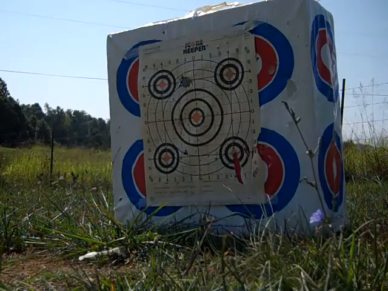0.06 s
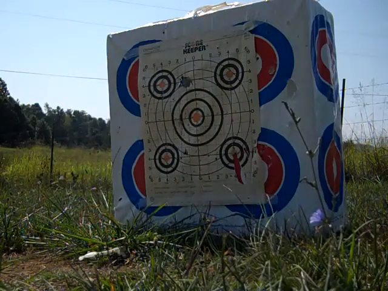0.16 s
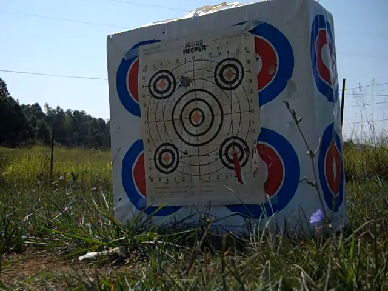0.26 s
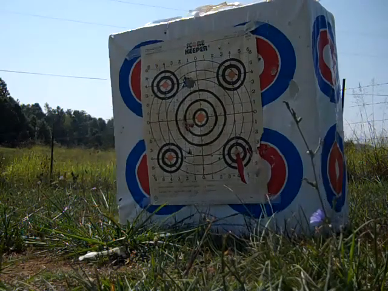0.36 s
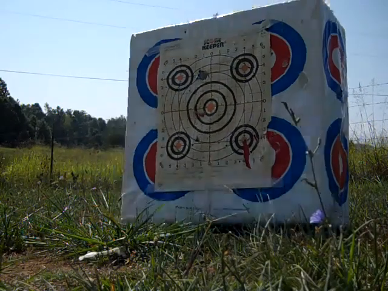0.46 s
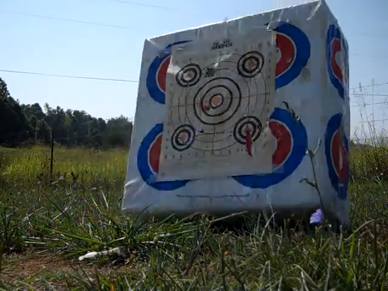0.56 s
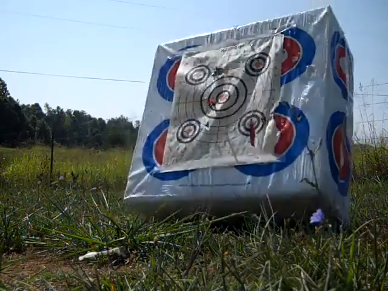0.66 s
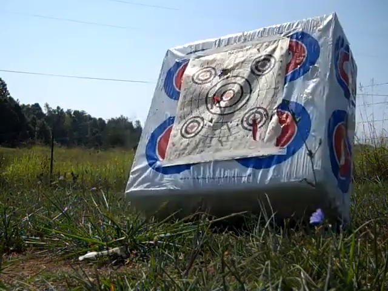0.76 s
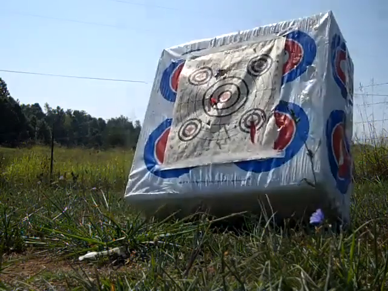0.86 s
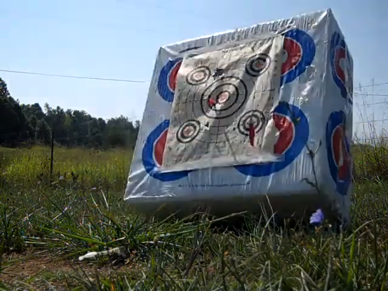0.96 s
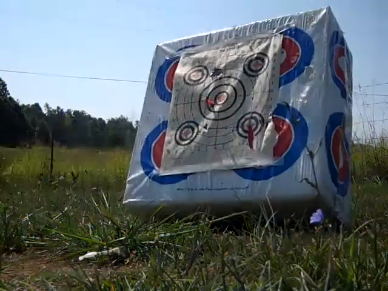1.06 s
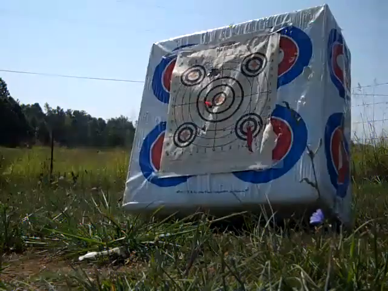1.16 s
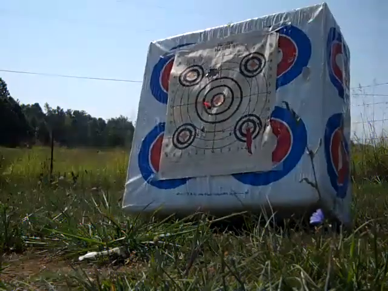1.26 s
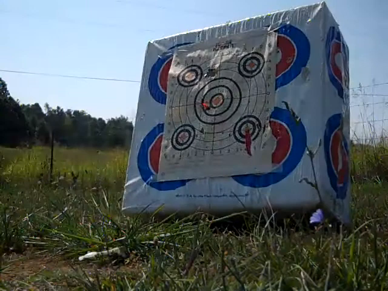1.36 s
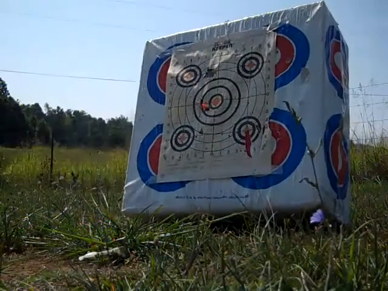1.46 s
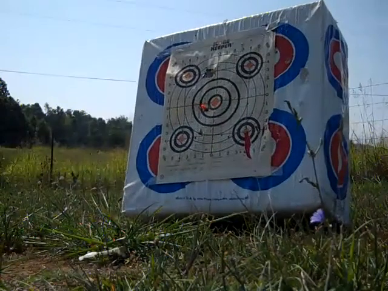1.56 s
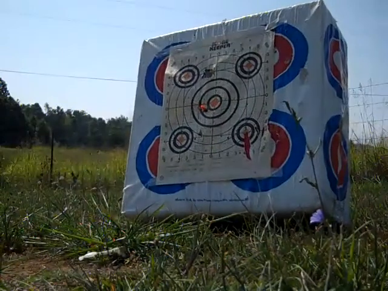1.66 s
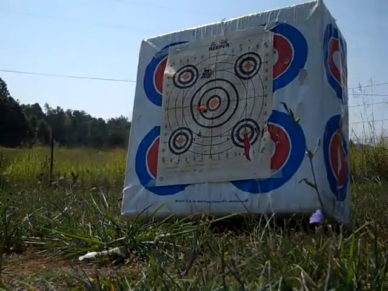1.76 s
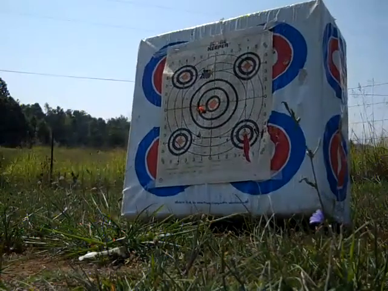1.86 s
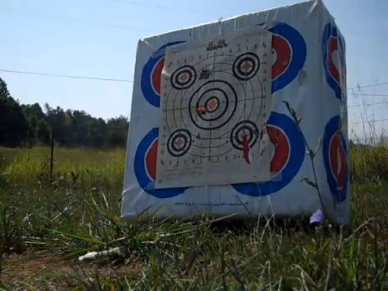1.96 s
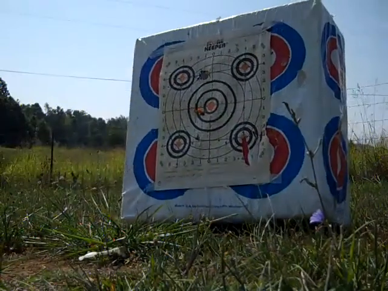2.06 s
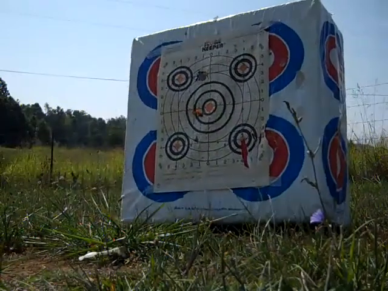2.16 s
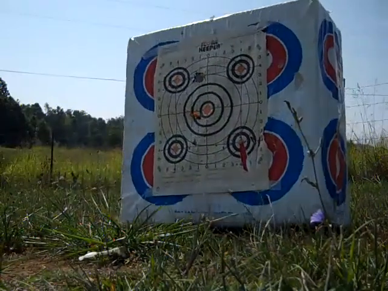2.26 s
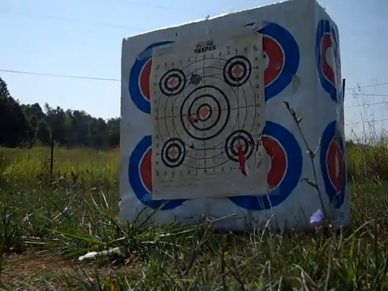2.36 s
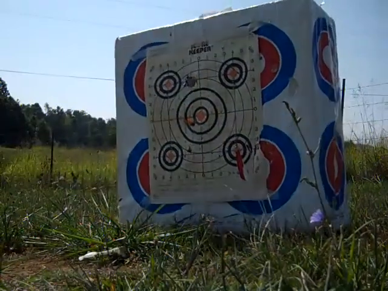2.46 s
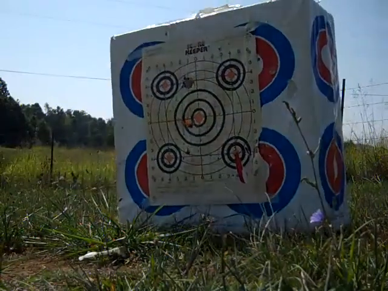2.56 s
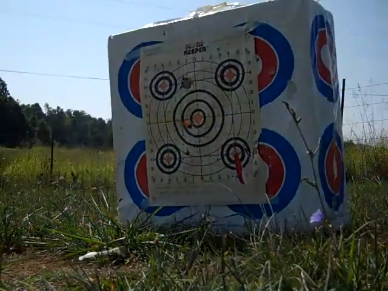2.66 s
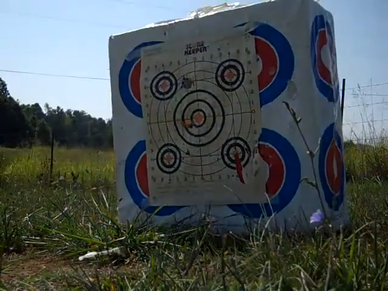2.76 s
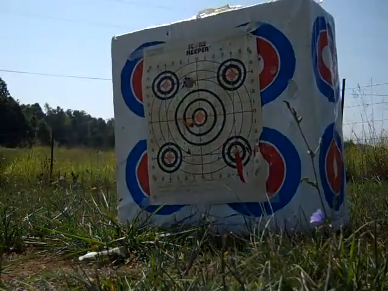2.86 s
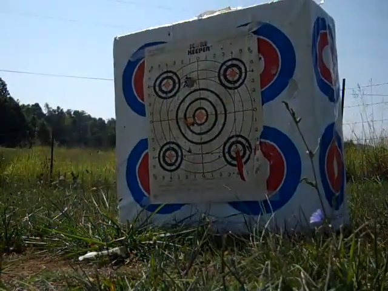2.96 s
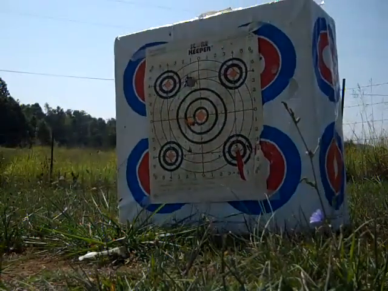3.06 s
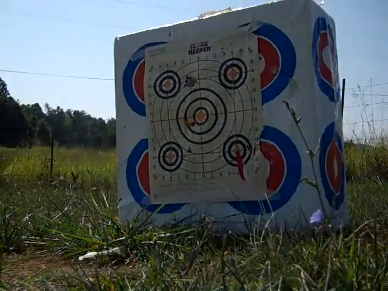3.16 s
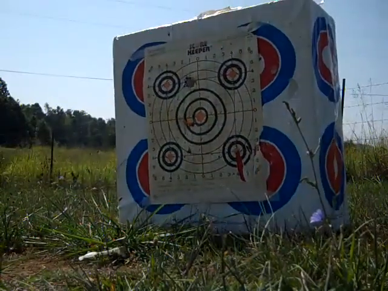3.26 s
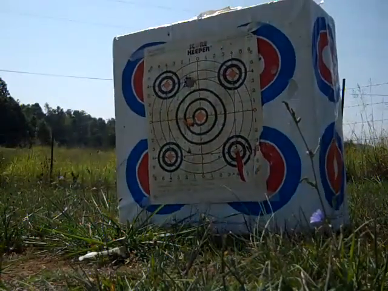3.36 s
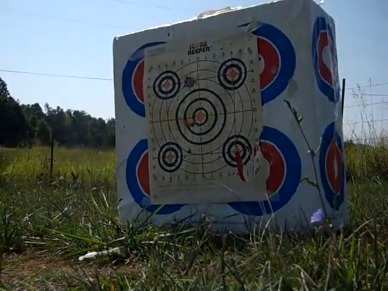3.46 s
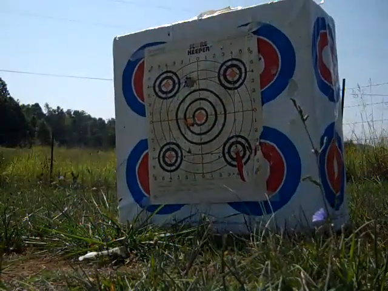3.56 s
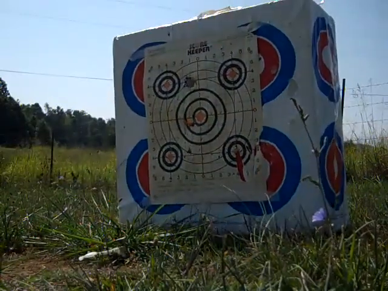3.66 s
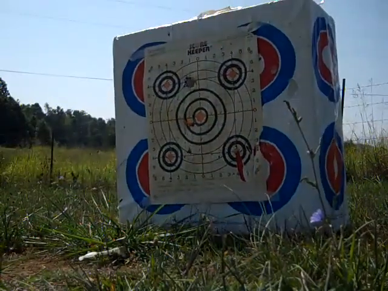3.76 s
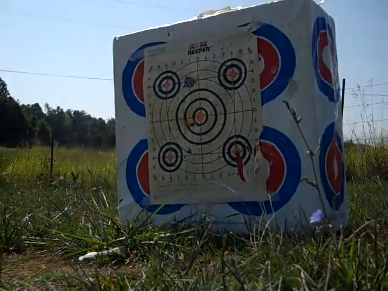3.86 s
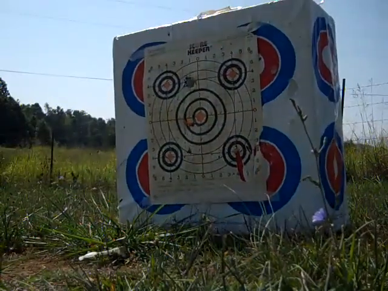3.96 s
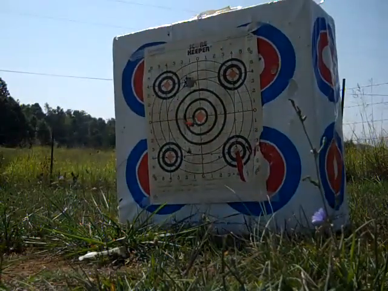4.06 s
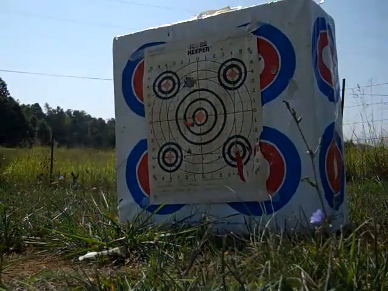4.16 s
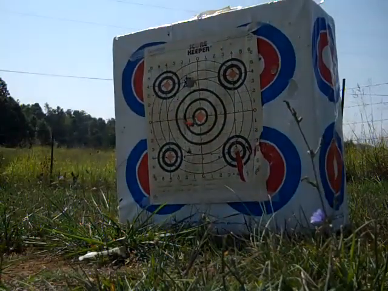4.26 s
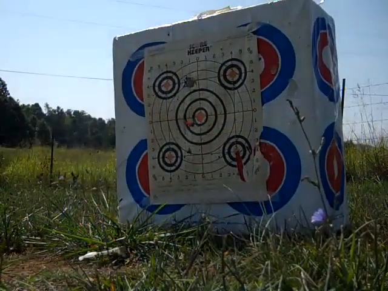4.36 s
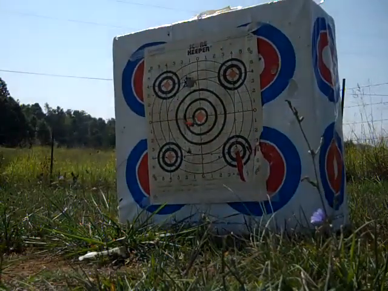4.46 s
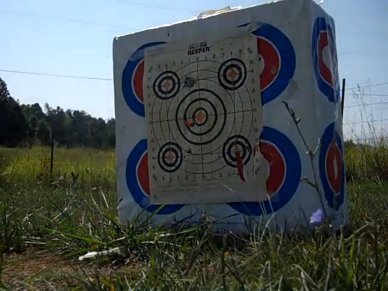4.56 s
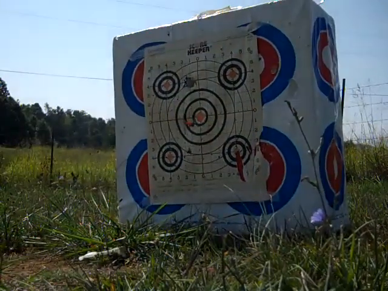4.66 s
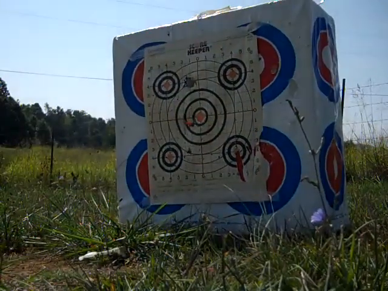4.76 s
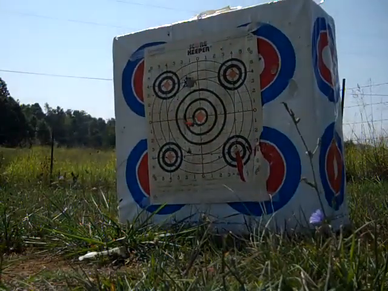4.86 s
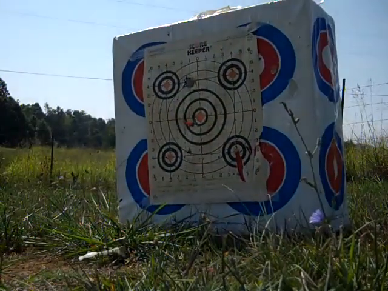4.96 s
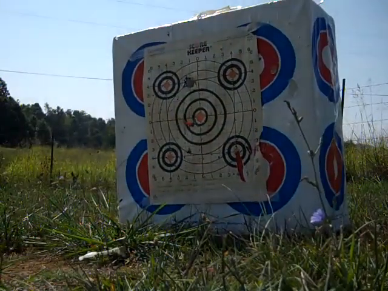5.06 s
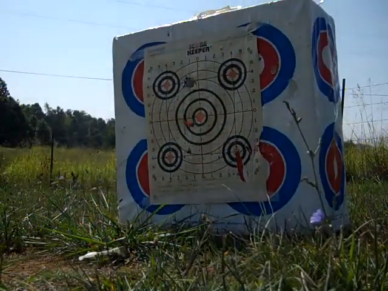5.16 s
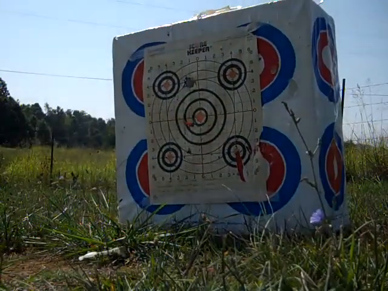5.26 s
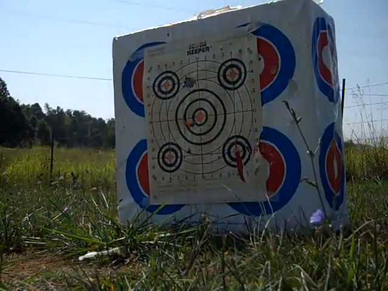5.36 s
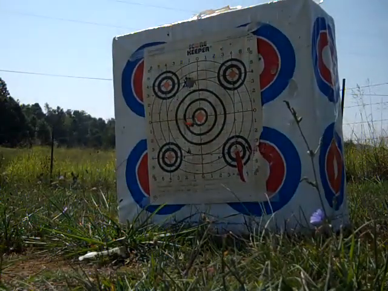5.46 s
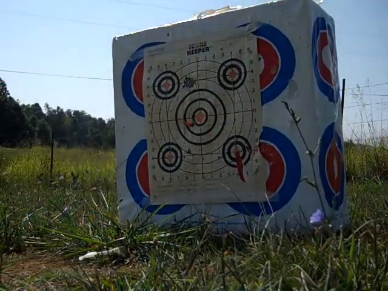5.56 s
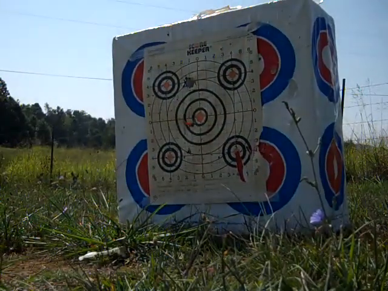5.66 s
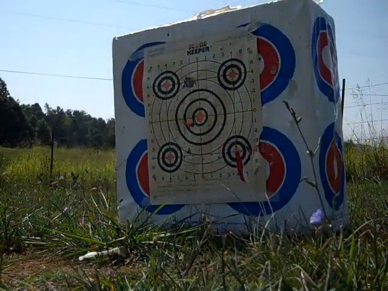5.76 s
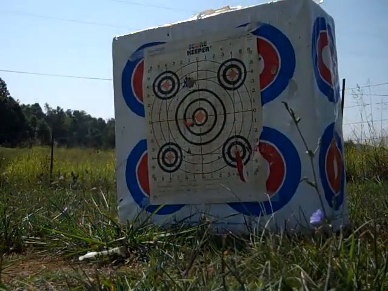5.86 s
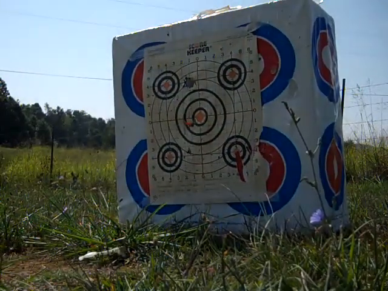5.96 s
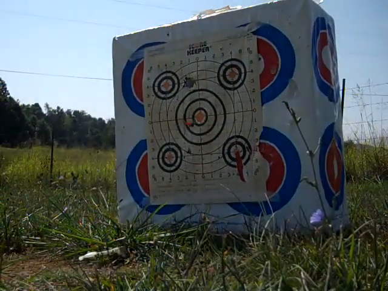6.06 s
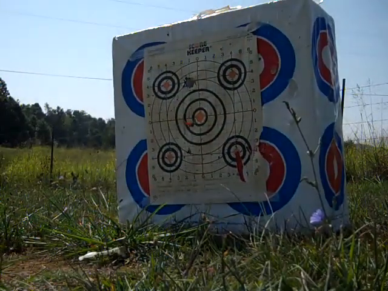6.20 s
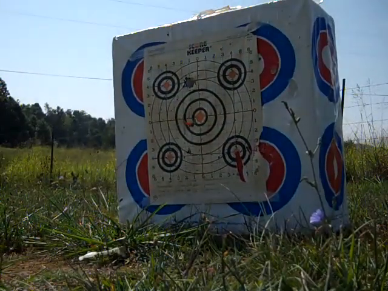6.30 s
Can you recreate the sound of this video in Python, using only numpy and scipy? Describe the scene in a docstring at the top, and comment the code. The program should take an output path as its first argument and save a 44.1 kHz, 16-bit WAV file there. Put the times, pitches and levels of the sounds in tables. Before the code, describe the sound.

Sharp, overloaded thwack of an arrow hitting a foam block, short rattling buzz and plastic crinkle, then a quiet open field with shimmering insects and breeze.

```python
"""An open summer field: an arrow hisses past the microphone and smacks into a wrapped foam target close by.
Swelling band noise makes the flight; noise cracks and decaying modes make the blow and booming block.
The shaft buzzes under chattering taps, the cover crinkles and ticks, and the blow overloads and ducks the level.
Noise-band and chirping insects, gliding bird whistles, a far rumble, steady hiss and a bumping breeze lie beneath."""
import sys
import numpy as np
from scipy import signal
from scipy.fft import rfft, irfft, next_fast_len
from scipy.io import wavfile
from scipy.ndimage import minimum_filter1d, map_coordinates

SR = 44100
rng = np.random.default_rng(int(sys.argv[2]) if len(sys.argv) > 2 else 0)


def persist_wave(psi):
    """Save psi, clipped to +-1, as 16-bit WAV."""
    counts = np.round(np.clip(psi, -1, 1) * 32767).astype(np.int16)
    wavfile.write(sys.argv[1], SR, np.atleast_2d(counts).T)


N = 279153
T = np.arange(N) / SR  # time [s]

# stages of the arrow driving in and stopping:
# start_s [s], level_db [dB], centre_hz [Hz], spread_octaves [octaves each way], t60_s [s], push_db on the block [dB]
BLOW_STAGES = [(0.477, 4.5, 6000, 0.89, 0.015, -5.5), (0.479, 8, 2800, 1.2, 0.025, -18),
               (0.4814, 1.5, 1114, 1.67, 0.048, -8.5), (0.4878, -7, 601, 0.57, .035, -3.5),
               (0.492, 3, 5500, 1.2, 0.029, -21), (0.4945, -1.5, 850, 0.79, .014, -3)]
LANDING_S = BLOW_STAGES[0][0]
SWING_START_S = 0.497  # the embedded shaft begins to swing


def undb(db):
    """Decibels to amplitude gain."""
    return 10 ** (np.asarray(db) / 20)


def unit(x):
    """Scale to rms 1."""
    return x / np.sqrt(np.mean(x ** 2))


def colour(x, points):
    """Filter by a (Hz, dB) spectrum, joined by straight lines over log frequency."""
    hz, db = np.transpose(points)
    size = next_fast_len(N + 4096)
    f = np.maximum(np.fft.rfftfreq(size, 1 / SR), 1)
    gain = undb(np.interp(np.log(f), np.log(hz), db))
    return irfft(rfft(x, size) * gain, size)[..., :N]


def pair(apart, size=N):
    """Noise at the two ports; apart 0 is alike, 1 unrelated."""
    mid, side = rng.standard_normal((2, size))
    return unit(np.array([mid + apart * side, mid - apart * side]))


def walk(rate):
    """Random drift with a spread near 1, sliding straight between rate new values per second."""
    steps = rng.standard_normal(8192)
    return 1.2 * map_coordinates(steps, [T * rate], order=1, mode="wrap")


def add(out, s, sound):
    """Mix a short sound in at time s."""
    i = max(int(s * SR), 0)
    part = sound[..., :N - i]
    out[..., i:i + part.shape[-1]] += part


def fade(t60):
    """A quarter second of exponential decay, losing 60 dB in t60 seconds."""
    return np.exp(-np.log(1000) * T[:SR // 4] / t60)


def ring(modes):
    """Decaying (Hz, dB, t60 s) modes answer one tap; neighbouring modes swing opposite ways."""
    out = np.zeros(SR // 4)
    for k, (hz, db, t60) in enumerate(modes):
        out += (-1) ** k * undb(db) * fade(t60) * np.sin(2 * np.pi * hz * T[:SR // 4])
    return out


def burst(hz, octaves, t60, apart, snap=0):
    """A crack: a clean click of height snap and dying noise, heard through a band around one pitch."""
    edges = np.clip(hz * 2 ** (np.array([-1, 1]) * octaves), 20, .45 * SR)
    band = signal.butter(3, edges, "bandpass", fs=SR, output="sos")
    noise = pair(apart, SR // 4)
    click = snap * signal.unit_impulse(SR // 4)
    crack = signal.sosfilt(band, noise * fade(t60) + click)
    return crack / signal.sosfilt(band, noise).std()


def swell(s, db, length_s):
    """Gain that rises to a rounded top at time s and dies away again."""
    return undb(db) * np.exp(1 - np.hypot(1, 2 * (T - s) / length_s))


def swells(rows, rest_db):
    """Gain of (s, dB, length s) swells, added in power to a resting level."""
    return np.sqrt(undb(rest_db) ** 2 + sum(swell(*row) ** 2 for row in rows))


def hiss(left_db=-54, right_db=-66):
    """A faint steady noise, stronger on the left."""
    # spectrum of the hiss: pitch_hz [Hz], level_db [relative dB]
    hiss_spectrum = [(100, -5.5), (600, 0.5), (1200, -6.5), (2300, -16), (14000, -26.5)]
    return unit(colour(pair(apart=0.97), hiss_spectrum)) * undb([[left_db], [right_db]])


def rumble(rumble_db=4.5, waver_db=1.0):
    """A dull far-off roar of low noise that swells and sinks."""
    # spectrum of the roar: pitch_hz [Hz], level_db [relative dB]
    roar_spectrum = [(40, -8), (120, 0), (220, 2.5), (330, -2), (480, -1.5), (640, -28.5), (1100, -34),
                     (2000, -51.5), (4000, -65)]
    # swells of the roar: peak_s [s], level_db [dB before rumble_db], length_s [s]
    roar_swells = [(0.25, -46, 0.26), (1.30, -46.5, 0.18), (1.88, -49, 0.12), (2.12, -49, 0.19),
                   (2.39, -53, 0.065), (3.28, -53, 0.46), (4.70, -54, 0.37), (5.30, -51, 0.17),
                   (5.60, -48.5, 0.27), (6.1, -54, 0.27)]
    level = swells(roar_swells, rest_db=-57.5) * undb(rumble_db + waver_db * walk(9))
    return unit(colour(pair(apart=0.45), roar_spectrum)) * level


def breeze(wind_db=-0.5, flutter_db=3.0, local_db=2, local_hz=135):
    """Turbulence presses on the ports, with single eddies as one push and pull of pressure."""
    # spectrum of the turbulence: pitch_hz [Hz], level_db [relative dB]
    wind_spectrum = [(20, -12.5), (50, 3), (120, 5.5), (200, -6.5), (330, -21.5), (600, -30), (1500, -44.5)]
    # gusts on the microphone: peak_s [s], level_db [dB before wind_db and flutter], length_s [s]
    gusts = [(0.70, -48.5, .08), (0.985, -46, .025), (1.60, -40.5, 0.23), (2.51, -40.5, .09),
             (3.06, -43, 0.15), (3.23, -34.5, 0.029), (3.32, -34, 0.077), (3.63, -36, 0.084),
             (3.88, -46.5, 0.22), (4.16, -36, 0.033), (4.31, -41.5, 0.12), (4.75, -40.5, 0.045),
             (4.85, -37.5, 0.043), (5.10, -36.5, 0.062)]
    # eddies that bump the microphone: centre_s [s], peak_db [dB before port scatter], pitch_hz [Hz]
    eddies = [(3.217, -27, 85), (3.236, -22, 130), (3.294, -28, 149), (3.321, -31, 100),
              (3.347, -30.5, 149), (3.62, -32, 126), (3.655, -24.5, 125)]
    shared = unit(colour(rng.standard_normal(N), wind_spectrum))
    # the slowest swirls press on one port more than on the other
    low_pass = signal.butter(2, local_hz, fs=SR, output="sos")
    local = signal.sosfilt(low_pass, unit(colour(rng.standard_normal(N), wind_spectrum)))
    side = undb(local_db) * local * np.array([[1], [-1]])
    calm_db = -54.5  # between gusts, before wind_db and flutter
    out = (shared + side) * swells(gusts, calm_db) * undb(wind_db + flutter_db * walk(25))
    for s, db, hz in eddies:
        turn = 2 * np.pi * hz * (T[:SR // 20] - 1 / 40)
        push_pull = turn * np.exp((1 - turn ** 2) / 2)
        port_gain = undb(db + 2 * rng.standard_normal((2, 1)))  # each port scatters by 2 dB
        add(out, s - 1 / 40, port_gain * push_pull)
    return out


def chorus(chorus_db=-38.5, shimmer_db=0.77):
    """Countless insects merge into a high, faintly shimmering noise band that surges once."""
    # the chorus and the hiss under it: pitch_hz [Hz], level_db [relative dB]
    chorus_spectrum = [(1500, -33.5), (2300, -26), (3300, -15.5), (4400, -9.5), (5100, -12.5),
                       (6200, -15.5), (7100, -3), (7900, 1.5), (8450, -5), (9000, -15.5), (10500, -23.5),
                       (14000, -24)]
    # more insects join in for a while: peak_s [s], level_db [dB against the steady chorus], length_s [s]
    chorus_surge = (4.73, -4.5, 0.56)
    surge = swells([chorus_surge], rest_db=0)
    band = unit(colour(pair(apart=0.62), chorus_spectrum))
    return band * surge * undb(chorus_db + shimmer_db * walk(60))


def insects():
    """A few nearer singers, each stroking its wing resonance at its own pace."""
    # singers: start_s [s], end_s [s], pitch_hz [Hz], wander_hz [Hz], chirp_rate [per s],
    # chirp_length_s [s], level_db [dB before wavering]
    singers = [(0.06, 6.4, 8130, 45, 7.55, .018, -40.5), (-0.02, 6.4, 8360, 45, 6.87, .018, -42),
               (0.8, 6.4, 8680, 40, 29, .012, -51), (1.3, 3.9, 5650, 450, 12, .025, -55),
               (0, 6.4, 4450, 150, 3.1, .13, -52.5)]
    out = np.zeros(N)
    for start, end, hz, wander, rate, length, db in singers:
        # time from the middle of the present stroke, with a slightly uneven pace
        stroke_s = ((rate * (T - start) + .04 * walk(3)) % 1 - .5) / rate
        chirps = np.exp(-2 * (stroke_s / length) ** 2) * (T > start) * (T < end)
        phase = 2 * np.pi * np.cumsum(hz + wander * walk(600)) / SR
        out += undb(db + 2 * walk(2.017)) * chirps * np.sin(phase) * 2 ** .5
    return out


def birds():
    """Thin, wavering sine whistles that crest early and slide down."""
    # notes: start_s [s], length_s [s], top_hz [Hz before waver], end_hz [Hz before waver],
    # level_db [dB before wavering]
    notes = [(1.49, .05, 3900, 3300, -53), (2.02, .05, 4000, 3400, -55), (2.28, .11, 4600, 4200, -52),
             (3.03, .08, 4550, 4200, -53), (3.46, .08, 5600, 4750, -50), (3.65, .07, 4750, 4450, -53),
             (3.96, .035, 4850, 4500, -51), (4.73, .08, 5650, 4600, -52), (5.845, .035, 3850, 3450, -51),
             (5.99, .028, 4400, 3650, -49), (6.12, .03, 4100, 3650, -51), (6.245, .03, 4100, 3700, -50)]
    out, waver_hz = np.zeros(N), 40 * walk(500)
    crest = .2  # fraction of the note
    for s, length, top_hz, end_hz, db in notes:
        u = np.linspace(0, 1, int(length * SR))
        glide = np.abs(u - crest) / (1 - crest)
        hz = top_hz + (end_hz - top_hz) * glide + waver_hz[T >= s][:len(u)]
        envelope = np.sqrt(np.abs(np.sin(np.pi * u)))
        add(out, s, undb(db) * envelope * np.sin(2 * np.pi * np.cumsum(hz) / SR))
    return out * undb(2 * walk(150))


def from_left(left, right, lag_s=.000102):
    """Sound from the left reaches the right port a moment later."""
    return np.array([left, np.interp(T - lag_s, T, right)])


def ticks(snap=9):
    """Short dry knocks: a click and a little dying noise through a band."""
    # knocks of bow, vane, cover and settling block:
    # start_s [s], peak_db [dB], centre_hz [Hz], spread_octaves [octaves each way], t60_s [s]
    knocks = [(0.111, -33.5, 420, 0.87, 0.027), (0.468, -5.5, 8700, 0.38, 0.002),
              (0.654, -18, 2000, 0.54, .02), (0.713, -26, 1400, 0.81, 0.021),
              (0.746, -28, 1490, 1.2, 0.022), (0.905, -31, 2600, 0.78, 0.018),
              (1.057, -27, 890, 0.6, 0.021), (1.097, -35, 2200, 0.9, .02), (1.172, -30, 2000, 1.2, .015),
              (1.232, -35, 2380, 1.1, 0.022), (1.462, -21.5, 1210, 1.3, 0.01),
              (1.4652, -34, 1600, 0.82, 0.034), (2.491, -38, 1195, 1.1, 0.024),
              (2.635, -33, 1140, 0.63, 0.021), (3.062, -40, 1700, 0.95, 0.028)]
    out = np.zeros((2, N))
    for s, db, hz, octaves, t60 in knocks:
        tick = burst(hz, octaves, t60, apart=.25, snap=snap)
        add(out, s, undb(db) * tick / np.abs(tick).max())
    return out


def cover(grain_db=2.5, rest_db=-56, settle_db_per_s=4):
    """Plastic wrap and paper face crinkle in uneven noise grains, resting ever lower as the block settles."""
    # spectrum of the crinkling: pitch_hz [Hz], level_db [relative dB]
    crinkle_spectrum = [(100, -24), (230, -1), (330, 6.5), (550, -5), (1000, -6.5), (1900, -8.5),
                        (2800, -6), (4500, -16), (8000, -30.5), (14000, -35.5)]
    # creases as the block tips, lands or rocks back: peak_s [s], level_db [dB], length_s [s]
    creases = [(0.703, -40.5, 0.098), (0.85, -36, 0.042), (0.948, -46, 0.11), (1.14, -45.5, 0.093),
               (2.544, -49, 0.22), (2.98, -53.5, 0.19)]
    age = np.maximum(T - LANDING_S, 0)
    creasing = swells(creases, rest_db - settle_db_per_s * age) * (age > 0)
    grains = pair(apart=.3) * undb(grain_db * walk(350))
    return unit(colour(grains, crinkle_spectrum)) * creasing


def swing(swing_db=-28.5, kick_db=6, kick_s=.03, sag_db_per_s=9, grip_s=0.69, grip_db_per_s=600):
    """Width of the shaft's swing: a kick, a slow sag, then the foam grips it to a quick stop."""
    age = np.maximum(T - SWING_START_S, 0)
    gripped = np.maximum(T - grip_s, 0)
    return undb(swing_db + kick_db * np.exp(-age / kick_s) - sag_db_per_s * age - grip_db_per_s * gripped)


def shaft(swing_hz=88, jitter=0.12, scatter_db=3, ring_db=-4, rattle_db=-2):
    """The free end whips to and fro, chafing the cover and ringing the shaft at every swing."""
    # modes of arrow shaft and nock: pitch_hz [Hz], level_db [relative dB], t60_s [s]
    shaft_modes = [(385, -12.5, .4), (721, -9.5, .06), (889, 1.5, .06), (1060, 3.5, .04), (1690, -5.5, .03),
                   (2207, 1.5, 0.021), (2700, -1, 0.0082), (2970, -6, .025), (3671, -6, .025)]
    # spectrum of the chafing: pitch_hz [Hz], level_db [relative dB]
    rattle_spectrum = [(200, -13), (500, 1.5), (1000, -1.5), (1500, -3.5), (2700, -1), (4400, -4.5),
                       (5300, -11), (6700, -6.5), (9000, -16), (12000, -30)]
    chance = rng.standard_normal((40, 2))
    taps = np.zeros(N)
    times = SWING_START_S + np.cumsum(np.abs(1 + jitter * chance[:, 0])) / swing_hz
    taps[(times * SR).astype(int)] = undb(scatter_db * chance[:, 1])
    # each tap is a short chatter rather than one clean click
    chatter = signal.fftconvolve(taps, fade(t60=0.065))[:N] * pair(apart=0.087)
    buzz = signal.fftconvolve(chatter, ring(shaft_modes)[None])[:, :N]
    rattle = colour(chatter, rattle_spectrum)
    moving = (T > times[0]) & (T < times[-1])
    buzz = undb(ring_db) * buzz / buzz[:, moving].std()
    rattle = undb(rattle_db) * rattle / rattle[:, moving].std()
    return (buzz + rattle) * swing()


def flight(falloff=1.35, flutter_db=0.5):
    """The vanes swish off the bow, then hiss past the microphone, louder the nearer, until the point lands."""
    # spectrum of the vane noise: pitch_hz [Hz], level_db [relative dB]
    vane_spectrum = [(300, -32), (1000, -23), (2400, -13), (3200, -18), (4600, -13.5), (7000, -9),
                     (8400, 2), (10000, -10), (12000, -18), (14000, -21)]
    release_s, swish_db, swish_length_s = 0.14, -39.5, 0.038
    passes_s, speed_m_s, miss_m, pass_db = 0.471, 70, .33, -12
    distance_m = np.hypot(speed_m_s * (T - passes_s), miss_m)
    flying = (T > release_s) & (T < LANDING_S)
    passing = undb(pass_db) * (miss_m / distance_m) ** falloff * flying
    gain = passing + swell(release_s, swish_db, swish_length_s)
    return unit(colour(pair(apart=0.41), vane_spectrum)) * gain * undb(flutter_db * walk(250))


def impact(right_db=1, boom_db=2):
    """The point bursts the cover, the shaft scrapes in and stops; each stage shoves the block."""
    # modes of the foam block and its taut cover: pitch_hz [Hz], level_db [relative dB], t60_s [s]
    block_modes = [(62, -16.5, 0.15), (124.2, -10.5, .09), (241, -2, .12), (288, -12.5, 0.061),
                   (352, -12.5, 0.13), (462, -5.5, 0.037), (637, -7.5, 0.037), (727, -11.5, 0.09),
                   (834, -3.5, 0.037), (1015, -6.5, 0.041)]
    out, boom = np.zeros((2, N)), undb(boom_db) * ring(block_modes)
    for s, db, hz, octaves, t60, push_db in BLOW_STAGES:
        crack = undb(db) * burst(hz, octaves, t60, apart=.35)
        add(out, s, crack + undb(push_db) * boom)
    return out * undb([[-right_db], [right_db]])  # leans to the right


def scene():
    """Open ground: everything arrives dry, the insects from the left, the birds from ahead."""
    shot = flight() + impact() + shaft() + cover() + ticks()
    meadow = from_left(*(chorus() + insects())) + birds()
    return shot + meadow + breeze() + rumble() + hiss()


def gain_control(x, threshold_db=-8, depth_db=9, hold_s=0.16, release_db_per_s=100, attack_s=0.034):
    """A loud peak pulls the gain down; it holds, then climbs back."""
    peak_db = 20 * np.log10(np.abs(x).max(axis=0) + 1e-9)
    over = np.clip(peak_db - threshold_db, 0, depth_db)
    size = int(hold_s * SR)
    # the greatest excess of the last hold_s
    held = -minimum_filter1d(-over, size, origin=(size - 1) // 2, mode="constant")
    cut = np.maximum.accumulate(held + release_db_per_s * T) - release_db_per_s * T
    pole = np.exp(-1 / (attack_s * SR))
    return x * undb(-signal.lfilter([1 - pole], [1, -pole], cut))


def record(dry, low_cut_hz=25, top_hz=14200):
    """Two unequal ports, a bass cut, gain control, overload and a steep top cut."""
    # the right microphone port against the left: pitch_hz [Hz], level_db [dB]
    right_port = [(100, -0.5), (2300, -1.5), (5000, -1.5), (6500, 5.5), (7200, 0.5), (7900, -12),
                  (8400, -15), (9200, -27.5), (11000, -10.5), (14000, -11.5)]
    ports = np.array([dry[0], colour(dry[1], right_port)])
    ports = signal.sosfilt(signal.butter(1, low_cut_hz, "high", fs=SR, output="sos"), ports)
    clipped = np.clip(gain_control(ports), -.92, .92)
    return signal.sosfilt(signal.ellip(12, .1, 100, top_hz, fs=SR, output="sos"), clipped)


dry = scene()
out = record(dry)
persist_wave(out)
```